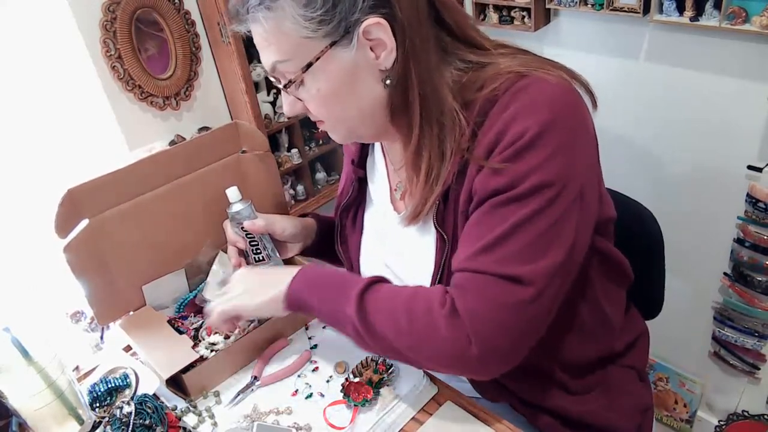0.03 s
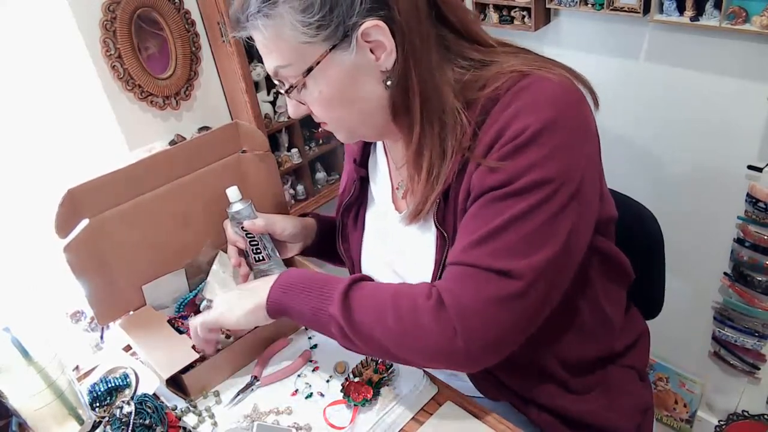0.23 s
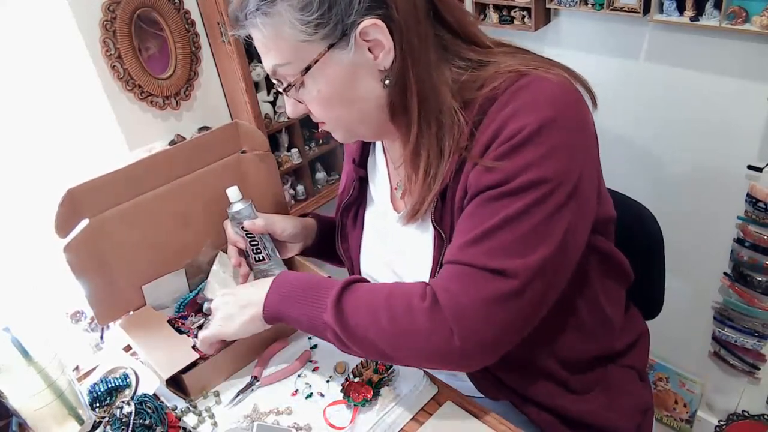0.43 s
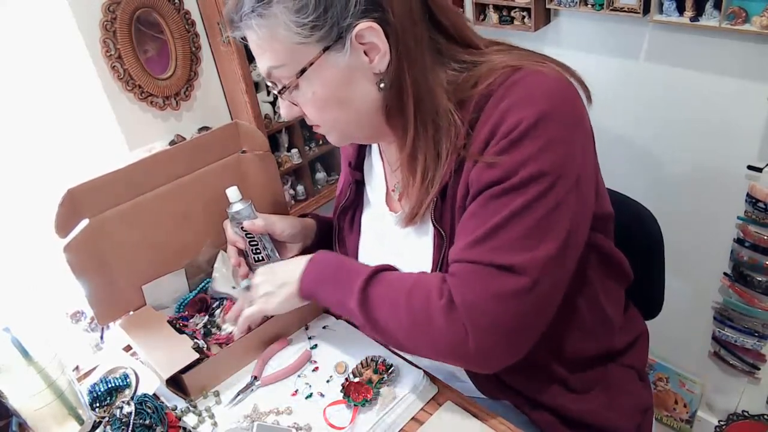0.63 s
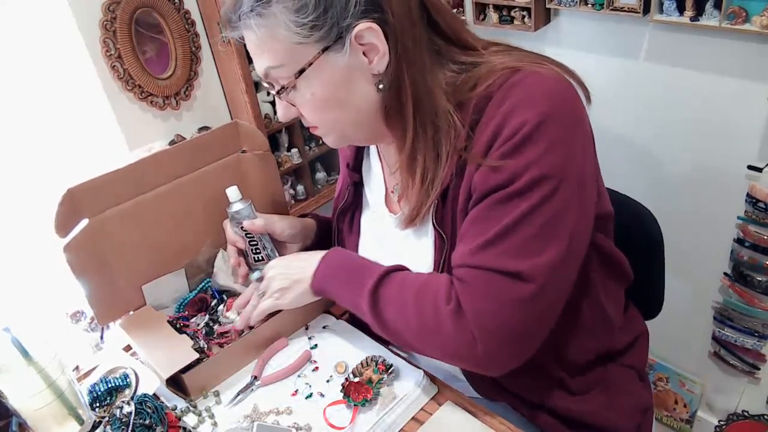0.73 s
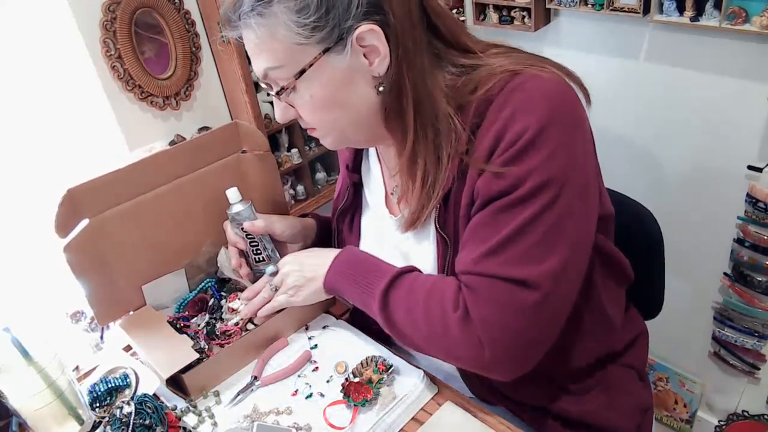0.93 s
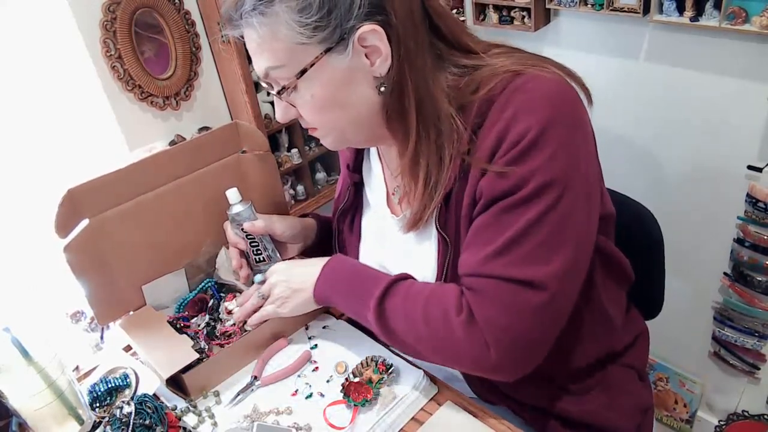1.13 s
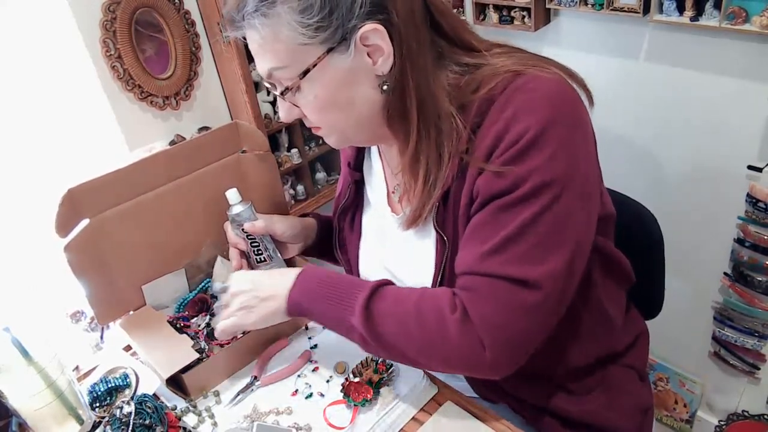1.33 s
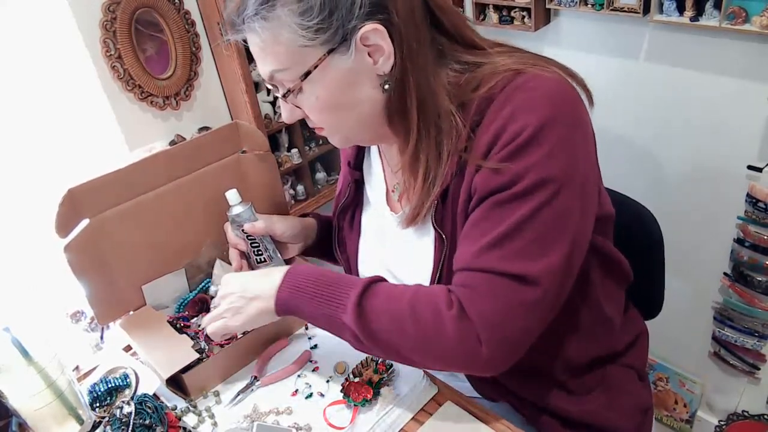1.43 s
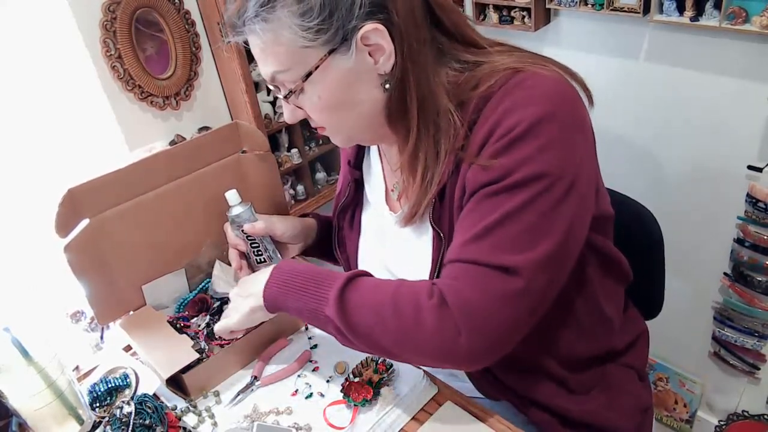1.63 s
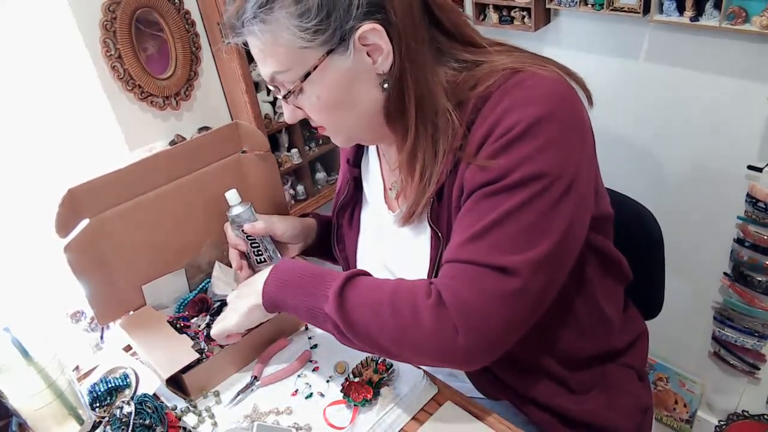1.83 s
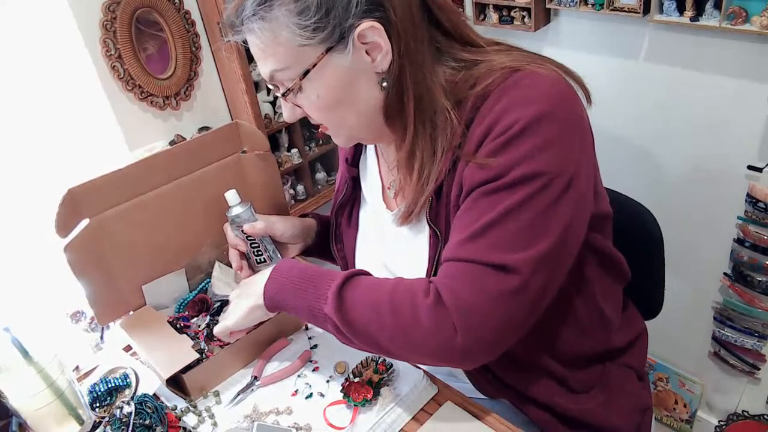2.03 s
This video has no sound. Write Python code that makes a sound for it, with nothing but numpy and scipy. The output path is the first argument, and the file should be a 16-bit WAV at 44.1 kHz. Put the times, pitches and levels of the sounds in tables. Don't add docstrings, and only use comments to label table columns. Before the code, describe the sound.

Close up in a small quiet room, beads, chain links and metal charms rattle in a cardboard box, with hard clacks and dull box knocks early on, then a lull and a few lighter rattles over faint hum.

```python
import sys
import numpy as np
from scipy import signal
from scipy.fft import rfft, irfft, next_fast_len
from scipy.io import wavfile
from scipy.ndimage import map_coordinates

SR = 44100
rng = np.random.default_rng(int(sys.argv[2]) if len(sys.argv) > 2 else 0)


def dump_mix(stems):
    frames = np.atleast_2d(stems).T
    limited = np.clip(frames, -1, 1)
    pcm = np.round(limited * 32767).astype(np.int16)
    wavfile.write(sys.argv[1], SR, pcm)


def voltage_ratio(decibels):
    exponent = np.asarray(decibels, float) / 20
    return 10 ** exponent


N = 91595


def unit(x):
    return x / np.sqrt(np.mean(x ** 2) + 1e-20)


def along(points, hz):
    f, value = np.transpose(points)
    return np.interp(np.log(hz + 1), np.log(f + 1), value)


def filtered(x, response):
    m = next_fast_len(N + SR // 2)
    return irfft(rfft(x, m) * response(np.fft.rfftfreq(m, 1 / SR)), m)[:N]


def rings(s, hz, gain, cycles, rise=0.95, size=400):
    t = np.arange(size) / SR
    hz = np.clip(hz, 50, 15500)[:, None]
    decay = voltage_ratio(-20 * t * hz / cycles)
    onset = 1 - np.exp(-(t * hz / rise) ** 2)
    fade = np.cos(np.pi / 2 * t / t[-1])
    wave = np.sin(2 * np.pi * hz * t) * decay * onset * fade
    at = np.round(s * SR).astype(int)[:, None] + np.arange(size)
    return np.bincount(at.ravel(), (gain[:, None] * wave).ravel(), N + size)[:N]


def shower(gain, per_s, hz, spread, cycles, uneven_db, size=200, mix=None):
    draw = rng.standard_normal((12000, 2)).clip(-2, 2)
    s = np.cumsum(rng.exponential(size=12000)) / per_s
    pick = rng.random(12000)
    keep = s < (N - 1) / SR
    s, hz = s[keep], np.atleast_1d(hz)
    at = (s * SR).astype(int)
    centre = hz[at] if len(hz) == N else hz[(pick[keep] * len(hz)).astype(int)]
    scatter = spread * (1 if mix is None else mix[at])
    pitch = centre * np.exp(scatter * draw[keep, 0])
    strength = voltage_ratio(uneven_db * draw[keep, 1])
    energy = np.sum(strength ** 2 * cycles / pitch) / (4 * np.log(10)) * SR / N
    return rings(s, pitch, strength * gain[at], cycles, size=size) / np.sqrt(energy)


def knocks(table, partials, cycles, rise):
    s, db, hz = np.transpose(table)
    vary = rng.standard_normal((len(s), len(partials), 2))
    out = np.zeros(N)
    for k, (ratio, level) in enumerate(partials):
        loose = k > 0
        pitch = hz * ratio * (1 + loose / 20 * vary[:, k, 0])
        gain = voltage_ratio(db + level + 2 * loose * vary[:, k, 1])
        out += rings(s, pitch, gain, cycles, rise * ratio)
    return out


# (f/Hz, level/dB per Hz)
HUM_TONE = [(18, -57), (30, 6), (311, -11.5), (540, -22.5), (889, -21.5), (1350, -29.5), (5170, -44),
            (6210, -35), (16000, -32)]


def hum():
    noise = rng.standard_normal(N)
    return voltage_ratio(-54) * unit(filtered(noise, lambda f: voltage_ratio(along(HUM_TONE, f))))


# (delay t/s, level/dB)
EARLY_ECHOES = [(.0025, -8.5), (.0058, -8), (.0085, -9.5), (0.012, -8.5), (.019, -13)]
# (f/Hz, fall by 60 dB t/s)
ROOM_DECAY = [(200, 0.24), (1700, 0.25), (6000, 0.18), (12000, 0.19)]


def room(x):
    tail_db, tail_delay = -1, 300
    out = np.pad(x, (0, SR))
    for s, db in EARLY_ECHOES:
        smear = lambda f: np.exp(1j * np.cos(f / 300 + s * 900))
        out[round(s * SR):][:N] += voltage_ratio(db) * filtered(x, smear)
    step = SR // 10
    for start in range(0, N, step):
        hz, t, z = signal.stft(rng.standard_normal(SR // 2), SR, nperseg=256)
        decay = voltage_ratio(-60 * t / along(ROOM_DECAY, hz)[:, None])
        tail = signal.istft(z * decay, SR, nperseg=256)[1]
        wet = signal.fftconvolve(x[start:start + step], tail / np.linalg.norm(tail))
        out[start + tail_delay:][:len(wet)] += voltage_ratio(tail_db) * wet
    return out[:N]


# (f/Hz, level/dB, fall by 60 dB t/s)
CHARM_MODES = [(4340, -31, .35), (5950, -28, .3), (7940, -21, 0.26), (8020, -20.5, 0.24), (8300, -28, 0.33),
               (9120, -16, 0.28), (9520, -27, 0.26), (9690, -22.5, 0.31), (11670, -34.5, 0.1457)]


def charm():
    flutter_db, flutter_rad = 5, 1.15
    t = np.arange(N) / SR
    flutter = lambda: map_coordinates(rng.standard_normal(600), [t * 200])
    out = np.zeros(N)
    for hz, db, t60 in CHARM_MODES:
        level = voltage_ratio(db - 60 * t / t60 + flutter_db * flutter())
        out += level * np.sin(2 * np.pi * hz * t + flutter_rad * flutter())
    return out


# (f/Hz, width f/Hz, level/dB)
BOX_PANELS = [(205, 24, -6.5), (404, 24, -12.5), (476, 108, -4), (586.5, 82, 2.5), (779, 45, -2.5),
              (975, 200, -18.5)]


def cardboard(gain):
    uneven = voltage_ratio(3.0 * rng.standard_normal(N // 200 + 1).repeat(200)[:N])
    pushes = rng.standard_normal(N) * uneven

    def panels(f):
        total = 0
        for k, (c, w, db) in enumerate(BOX_PANELS):
            total = total + (-1) ** k * voltage_ratio(db) * 1j * f * w / (c * c - f * f + 1j * f * w)
        soft = 1 / (1 + 1j * f / 1500)
        return total * soft * (1j * f / 120) / (1 + 1j * f / 120)

    return filtered(gain * pushes, panels) / np.std(filtered(pushes, panels))


# (t/s, peak level/dB, f/Hz)
FLOOR_THUDS = [(0.042, -41.5, 191), (.05, -34, 388), (0.169, -36.5, 205), (.215, -46, 225),
               (.315, -25.5, 205), (0.331, -35.5, 160), (0.464, -43, 190), (0.552, -58, 191),
               (.66, -37, 172), (0.726, -37, 190), (0.803, -35, 205), (1.775, -29.5, 600),
               (.218, -25.5, 560), (.302, -19, 583), (0.319, -13, 585), (1.391, -44.5, 82.3),
               (.78, -16.5, 966)]


def thuds():
    s, db, hz = np.transpose(FLOOR_THUDS)
    return rings(s, hz, voltage_ratio(db), cycles=8.1, rise=0.35, size=3000)


# (t/s, length t/s, level/dB, f/Hz)
BEAD_STRANDS = [(0, .14, -38.5, 4500), (1.092, .24, -59, 4550), (1.244, .09, -60, 5500),
                (1.63, .04, -62, 3740), (1.66, .08, -48, 1800), (0.203, .04, -39, 5600),
                (.8, .09, -38, 1150), (.64, .06, -28, 1550)]


def strands():
    t = np.arange(N) / SR
    out = np.zeros(N)
    for s, length, db, hz in BEAD_STRANDS:
        drag = voltage_ratio(db) * ((t >= s) & (t < s + length))
        out += shower(drag, per_s=600, hz=hz, spread=.04, cycles=30, uneven_db=3, size=700)
    return out


# (t/s, peak level/dB, f/Hz)
LONE_PINGS = [(.045, -15.5, 5426), (0.055, -14, 6029), (.064, -18, 9700), (.090, -20, 9000),
              (0.093, -36, 4392), (.121, -32, 4270), (.132, -31, 6029), (.187, -21.5, 3095),
              (.187, -28, 4134), (.205, -23.5, 4760), (0.213, -25, 5600), (0.22, -25, 5580),
              (.219, -26, 2390), (.220, -29, 2910), (.291, -26.5, 3250), (.313, -27, 6100),
              (.338, -29, 6804), (0.434, -21, 6700), (.444, -35, 11650), (.461, -30, 11714),
              (.463, -24, 3180), (0.494, -20.5, 4060), (0.504, -29, 6800), (.518, -18, 6800),
              (.527, -20, 6600), (0.602, -20, 3270), (.602, -17, 4737), (.620, -26, 10200),
              (.641, -13.5, 5270), (.692, -26, 6840), (.771, -20, 9680), (.772, -15, 9550),
              (.771, -12, 6500), (.868, -33, 5167), (0.914, -25, 5943), (0.936, -22, 4737),
              (1.004, -41, 4500), (1.004, -30, 9650), (1.011, -25, 6718), (1.101, -54, 4565),
              (1.122, -35.5, 2756), (1.123, -32, 7493), (1.123, -31, 8340), (1.123, -35, 9905),
              (1.132, -25, 7300), (1.161, -29, 5943), (1.249, -49, 4700), (1.291, -46, 4650),
              (1.332, -37, 3800), (1.334, -34, 7140), (1.344, -31, 6550), (1.631, -51.5, 3875),
              (1.692, -46, 3400), (1.703, -47, 5370), (1.753, -26, 3920), (1.82, -26, 3080),
              (1.829, -27, 4823), (2.044, -43, 3200), (2.068, -39, 3220)]


def pings():
    s, db, hz = np.transpose(LONE_PINGS)
    return rings(s, hz, voltage_ratio(db), cycles=36, rise=3, size=900)


def dull(x):
    top_hz = 10270
    return filtered(x, lambda f: 1 / (1 + 1j * f / top_hz / 1.196 - (f / top_hz) ** 2) ** 2)


# (t/s, peak level/dB, f/Hz)
BEAD_TICKS = [(0.1235, -21.5, 3030), (0.2054, -25.5, 5546), (0.4333, -19, 6000), (0.77, -19, 7050),
              (0.9259, -22, 4890), (0.9377, -18, 6500), (1.0041, -19, 6900), (1.0143, -21, 8170),
              (1.0295, -18, 7200), (1.1228, -22.5, 6770), (1.1324, -52, 7260), (1.1615, -27.5, 5660),
              (1.3332, -22, 3750), (1.343, -31, 6330), (1.3644, -23, 3110), (1.4296, -27, 5510),
              (1.83, -16.5, 5940)]
# (ratio to the main mode, level/dB)
BEAD_MODES = [(1, 2), (.66, -1), (.83, -2), (1.14, -1), (1.28, -1)]


def ticks():
    return dull(knocks(BEAD_TICKS, BEAD_MODES, cycles=13.95, rise=5.8))


# (peak t/s, rise t/s, large beads level/dB, small beads
# level/dB, cardboard level/dB)
HAND_SHOVES = [(0.0, .01, -18, -20, -39.5), (0.027, 0.014, -31, -28, -42.5), (0.054, 0.014, -53, -25, -60),
               (0.131, 0.012, -29.5, -33.5, -44.5), (0.189, 0.028, -28.5, -41, -33),
               (0.218, 0.11, -30.5, -38, -54), (0.301, 0.018, -21, -33, -28),
               (0.326, 0.027, -20.5, -33, -53), (0.439, 0.03, -43, -34, -63),
               (0.469, 0.043, -17, -30, -34.5), (0.52, 0.085, -29.5, -32.5, -56.5),
               (0.57, 0.076, -37.5, -49, -34.5), (0.636, 0.18, -16, -25.5, -49),
               (0.692, 0.27, -19, -28.5, -46.5), (0.74, 0.095, -24.5, -29.5, -44),
               (0.787, 0.05, -19, -24, -39.5), (0.832, 0.0068, -43, -29.5, -48.5),
               (0.947, 0.15, -36.5, -34.5, -64), (1.04, 0.032, -58.5, -46.5, -83),
               (1.14, 0.055, -45.5, -39.5, -65.5), (1.188, 0.025, -51.5, -45.5, -68),
               (1.25, 0.023, -57.5, -62, -74),
               (1.302, 0.038, -55, -53, -62), (1.338, 0.015, -41.5, -33, -56),
               (1.367, 0.018, -37.5, -42, -57), (1.427, 0.11, -70.5, -44, -71),
               (1.68, 0.03, -43, -51.5, -51), (1.727, 0.092, -44, -49, -70), (1.755, 0.0083, -24, -27, -46),
               (1.769, .01, -31, -36.5, -55), (1.827, 0.01516, -27, -27.5, -49.5),
               (1.861, 0.0242, -36, -30.5, -50.5), (1.901, 0.056, -44, -45.5, -60),
               (2.049, 0.06, -41.5, -51, -58), (2.08, 0.051, -35, -38, -49.5)]


def stir():
    climb_db, settle_db_per_s = 18, 446.5
    rows = np.array(HAND_SHOVES)
    late = np.arange(N) / SR - rows[:, :1]
    rise = np.abs(rows[:, 1:2])
    shape = voltage_ratio(np.where(late < 0, climb_db * late / rise, -settle_db_per_s * late))
    return np.sqrt(voltage_ratio(rows[:, 2:]).T ** 2 @ shape ** 2)


# (t/s, f/Hz, mix of sizes as a factor on the pitch scatter)
LARGE_ON_TOP = [(0, 1700, 0.81), (.45, 1740, 0.68), (0.799, 1762, 1.2), (1.4, 1880, 1.19), (1.62, 1806, .3),
                (1.74, 1844, 0.18), (1.8, 1860, 1.07), (2.08, 1764, 0.7)]
# (t/s, f/Hz)
SMALL_ON_TOP = [(0, 6730), (.09, 5850), (.13, 4070), (.22, 5190), (.6, 5620), (1.0, 6650), (1.36, 5120),
                (1.65, 4390), (1.76, 6600), (2.08, 5000)]
LINK_MODES = [3150, 3700, 4450, 5250, 5850, 6600, 7200, 8000, 9200]
# (t/s, length t/s, level/dB)
CHAIN_HISS = [
    (.0, 0.11, -43.5),
    (1.332, 0.095, -51),
]


def beads(large, small):
    t = np.arange(N) / SR
    small_hz = np.interp(t, *np.transpose(SMALL_ON_TOP))
    fine = shower(small, per_s=3000, hz=small_hz, spread=0.412, cycles=7.6, uneven_db=5.5, size=200)
    links = shower(small, per_s=260, hz=LINK_MODES, spread=0.028, cycles=92, uneven_db=-2.5, size=900)

    chain = np.zeros(N)
    for s, length, db in CHAIN_HISS:
        start, end = (t - s + 0.0046) / .004, (s + length - t) / length * 3
        chain += voltage_ratio(db) * np.clip(np.minimum(start, end), 0, 1)
    crackle = voltage_ratio(-22.5) * small + chain
    grit = shower(crackle, per_s=4000, hz=13600, spread=0.19, cycles=11, uneven_db=-2.0, size=40)

    s, hz, mix = np.transpose(LARGE_ON_TOP)
    heavy = shower(large, per_s=1300, hz=np.interp(t, s, hz), mix=np.interp(t, s, mix),
                   spread=0.13, cycles=4.45, uneven_db=3.5, size=300)
    return heavy + dull(fine + voltage_ratio(-12) * links) + grit


# (t/s, peak level/dB, f/Hz)
BEAD_CLACKS = [(0.012, -14.5, 1650), (0.021, -12, 1710), (1.333, -31.5, 1820), (1.374, -35.5, 1950),
               (0.1221, -24.5, 2067), (0.2905, -4, 1670), (0.3151, -6.5, 1460), (0.3369, -21, 1420),
               (0.4325, -9, 1720), (0.4665, -26, 1780), (0.564, -9.5, 2010), (0.631, -3, 1986),
               (0.7718, 2.5, 1758), (1.365, -28.5, 1600), (1.7612, -21, 1940), (1.8193, -17.5, 1950),
               (1.853, -15, 2040)]


def clacks():
    modes = [(1.026, 2.5), (0.6, -17), (1.155, -5.5), (1.4, -10.5)]  # (ratio, level/dB)
    return knocks(BEAD_CLACKS, modes, cycles=7.1, rise=1.39)


def scene():
    large, small, box = stir() * voltage_ratio(-2.5)
    near, knock = ticks() + pings(), clacks()
    sent = voltage_ratio(-9) * near + voltage_ratio(-6) * knock
    wet = room(beads(large, small) + cardboard(box) + sent)
    direct = near + knock - sent
    return (wet + direct + thuds() + charm() + hum() + strands())[None]


def top_cut(x):
    return signal.sosfilt(signal.butter(12, 16320, fs=SR, output="sos"), x)


def record(dry):
    low_hz, top_hz = 61.6, 15780
    cut = filtered(dry[0], lambda f: (1j * f / (low_hz + 1j * f)) ** 4 * (f < top_hz))
    return top_cut(cut[None])


dry = scene()
out = record(dry)
dump_mix(out)
```